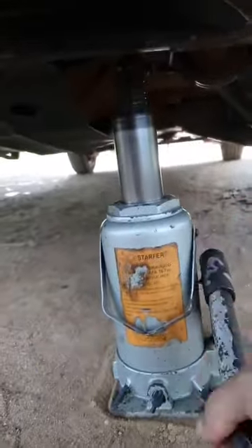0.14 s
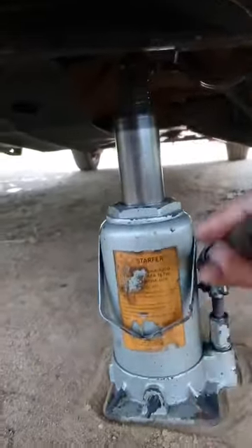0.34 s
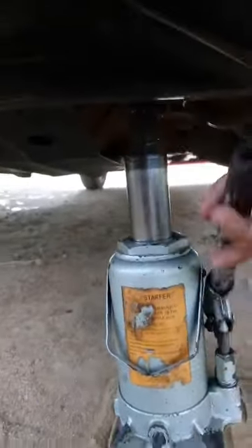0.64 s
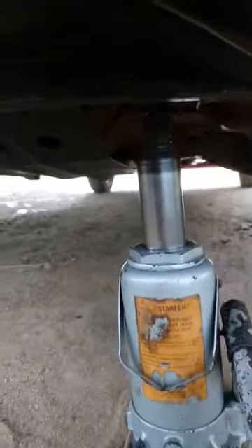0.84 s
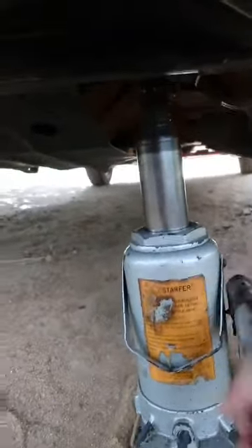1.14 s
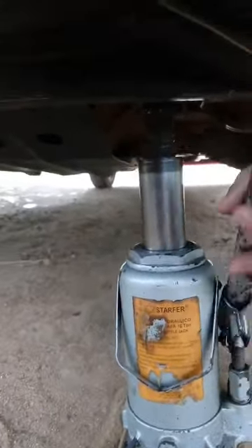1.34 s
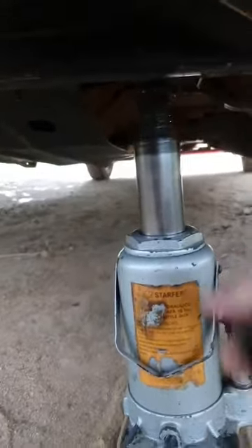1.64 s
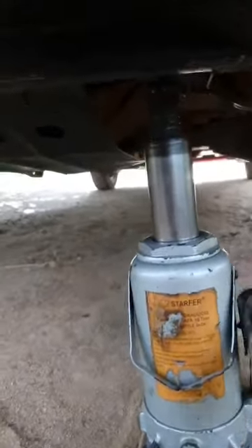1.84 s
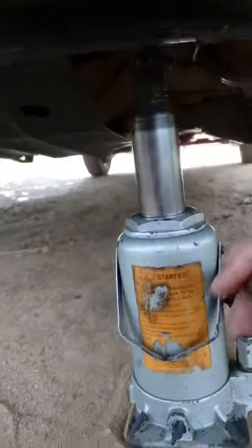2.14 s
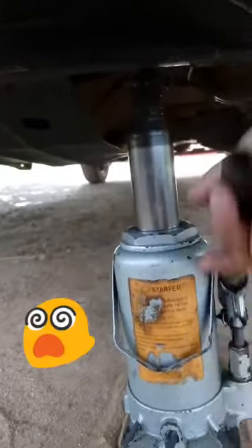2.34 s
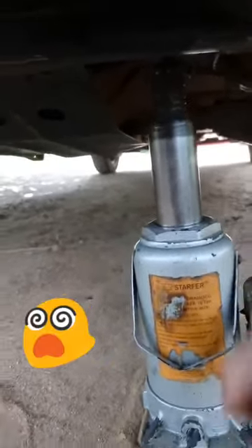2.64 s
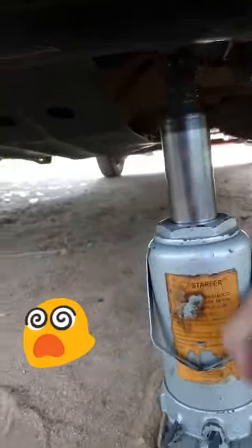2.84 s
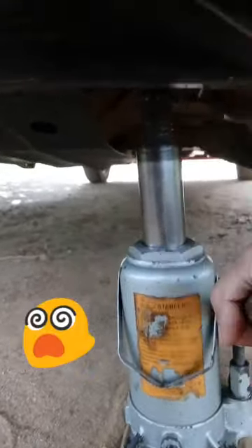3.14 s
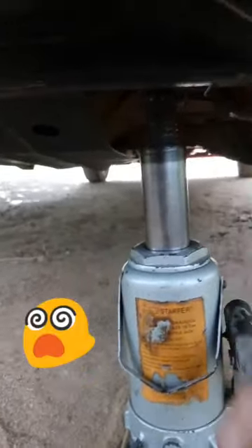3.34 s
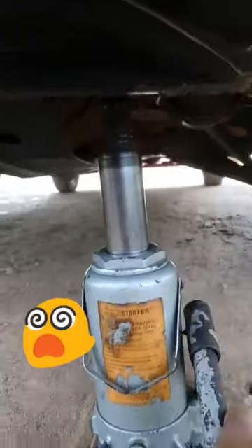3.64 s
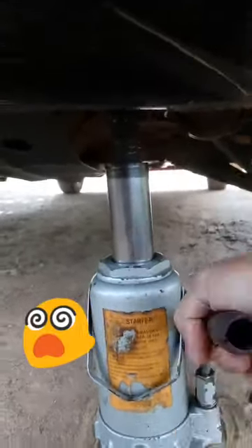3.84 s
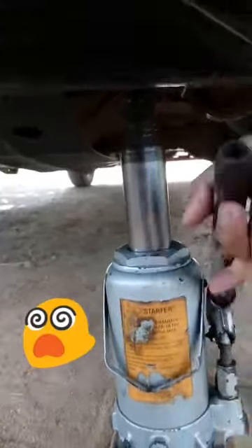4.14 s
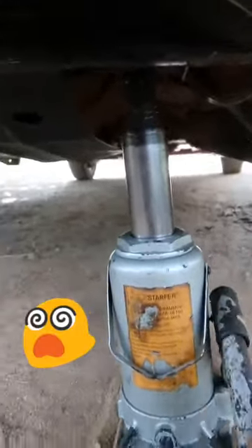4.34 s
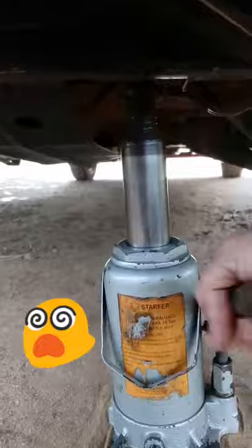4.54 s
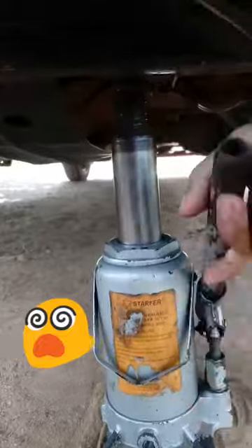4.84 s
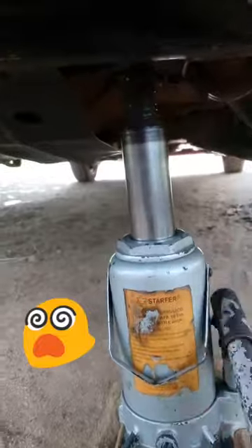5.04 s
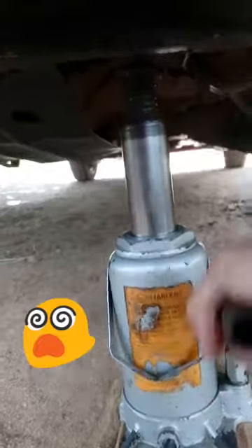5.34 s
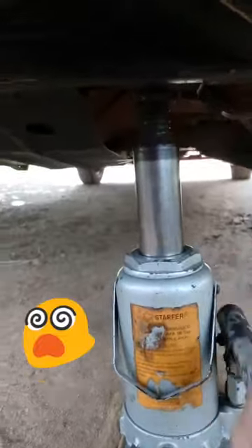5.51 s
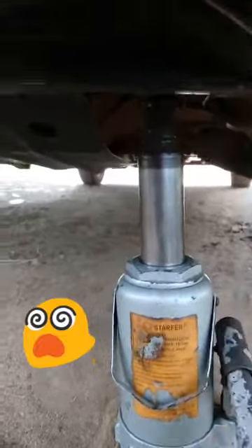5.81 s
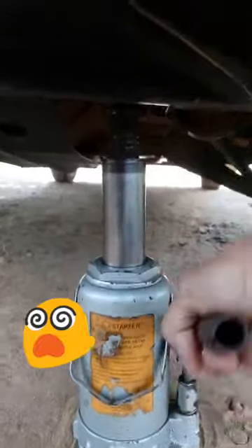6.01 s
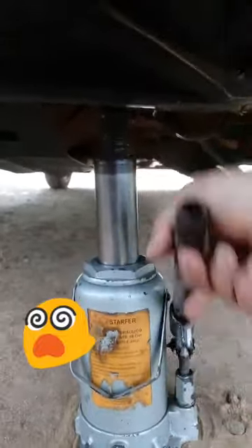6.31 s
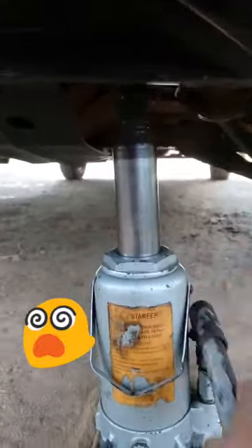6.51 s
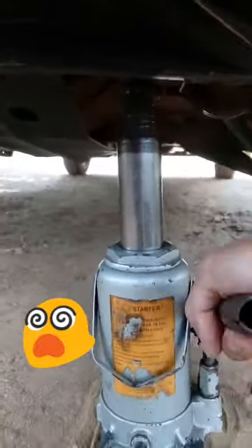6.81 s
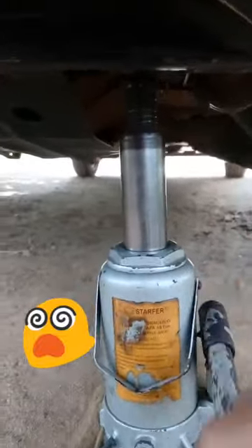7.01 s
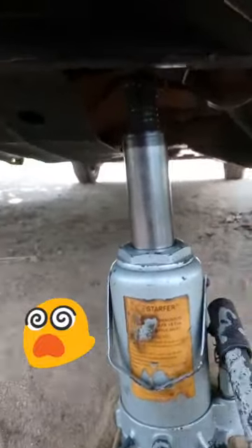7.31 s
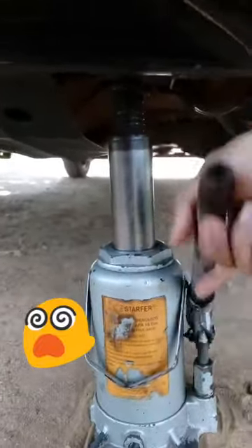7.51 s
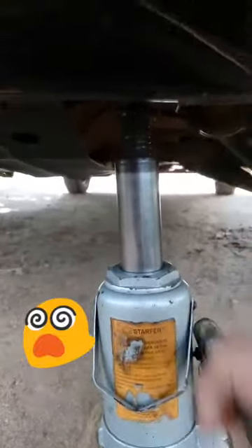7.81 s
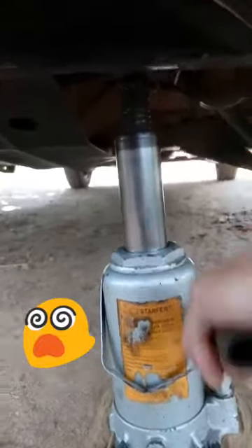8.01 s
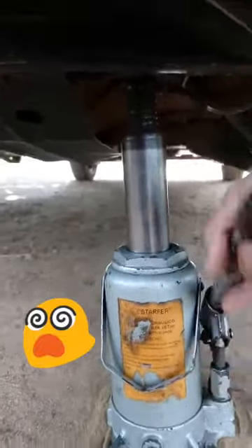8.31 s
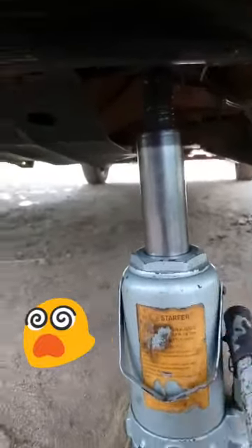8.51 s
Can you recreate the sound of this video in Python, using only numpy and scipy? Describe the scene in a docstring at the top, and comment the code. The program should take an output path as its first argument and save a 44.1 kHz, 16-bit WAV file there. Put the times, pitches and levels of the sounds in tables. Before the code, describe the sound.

From 0 s to about 8.6 s, a hydraulic bottle jack under a car is pumped by hand without a break, around two to three strokes a second. Loose pins and the handle socket make crisp, very short steel clicks, each with a tiny scrape before it and gritty chatter after. Duller, harder clacks mark the handle bottoming out, standing out near 0.5, 1.6, 3.7, 4.4, 5.5 and 7.4 s; bright tight clicks stand out around 2.5, 3.5, 5.3 and 7.6 s. Between them the tube rings briefly and small rebounds tick. Soft low body thuds with weaker repeats lie beneath, fuller from 7 s on. A few faint low bumps come near 4.1, 5.2 and 6.2 s. The stereo microphone is close, the jack slightly right, with short echoes from the underside and a quiet, slowly shifting outdoor wash.

```python
"""Hydraulic bottle jack under a car

A hydraulic bottle jack is pumped by hand, heard in quick strokes, under a car, close to a two-port microphone.
Loose socket and linkage pins click and chatter: noise forces drive decaying steel, handle-tube and body modes.
The oil-filled body thuds, heavily at stroke ends, lightly in between; each thud repeats twice, weaker.
The gap between car and ground throws the jack back briefly as sparse decaying taps.
Under it all lie a soft outdoor floor of shaped noise with drifting patches and a few low noise bumps."""
import sys
import numpy as np
from scipy import signal
from scipy.fft import rfft, irfft, next_fast_len
from scipy.io import wavfile
from scipy.ndimage import uniform_filter1d

SR = 44100
rng = np.random.default_rng(int(sys.argv[2]) if len(sys.argv) > 2 else 0)


def log_audio(samples):
    """Write samples as a 16-bit WAV file to the path given in sys.argv[1]."""
    # one column per channel
    frames = np.atleast_2d(samples).T
    # limit to full scale, then quantise
    limited = np.clip(frames, -1, 1)
    pcm = np.round(limited * 32767).astype(np.int16)
    wavfile.write(sys.argv[1], SR, pcm)


N = 381896
LEAD_S = 1500 / SR  # room before each contact for its scrape
SIDE = np.array([[.5], [-.5]])  # splits a left-right difference over the ports


def gain_of(db):
    """Decibels to gain."""
    return 10 ** (np.asarray(db) / 20)


def evened(x):
    """Scales to rms 1."""
    return x / np.sqrt(np.mean(x ** 2) + 1e-20)


def read(points, hz):
    """Reads a table on a log-frequency axis."""
    points_hz, value = np.transpose(points)
    return np.interp(np.log(hz + 1), np.log(points_hz + 1), value)


def add(mix, start_s, sound):
    """Mixes a sound in at start_s, cropped to the mix."""
    at = round(start_s * SR)
    sound = sound[:, max(-at, 0):]
    part = mix[:, max(at, 0):][:, :sound.shape[1]]
    part += sound[:, :part.shape[1]]


def filtered(x, response):
    """Applies a response given as a function of Hz."""
    size = next_fast_len(N + 4096)
    hz = np.fft.rfftfreq(size, 1 / SR)
    return irfft(rfft(x, size) * response(hz), size)[..., :N]


# Sound from all sides: hz, left_right_likeness
DIFFUSE_SAME = [(280, .96), (650, .15)]


def paired(z, hz):
    """Long waves reach both ports alike, short ones do not."""
    same = np.clip(read(DIFFUSE_SAME, hz), 0, 1)[:, None]
    return np.array([z[0], same * z[0] + np.sqrt(1 - same ** 2) * z[1]])


# Outdoor floor spectrum, relative: hz, density_db
FLOOR = [(25, 7), (238, 9), (368, -5.5), (496, 6), (787, -8), (5880, -13.5), (8140, -25.5), (14800, -34),
         (16000, -50)]
FLOOR_DB = -49


def floor():
    """Soft outdoor wash: shaped noise whose level drifts in time-frequency patches."""
    frames, hz = N // 256 + 5, np.fft.rfftfreq(1024, 1 / SR)
    a, b, c, d, patches = rng.standard_normal((frames, 513, 5)).T
    patches = uniform_filter1d(patches, size=10, axis=0)  # over frequency
    patches = evened(uniform_filter1d(patches, size=12, axis=1))  # over time
    level_db = read(FLOOR, hz)[:, None] + 2.5 * patches
    z = paired([a + 1j * b, c + 1j * d], hz) * gain_of(level_db)
    wash = signal.istft(z, nperseg=1024, noverlap=768)[1][:, :N]
    return gain_of(FLOOR_DB) * evened(wash)


SWELL_MS = 1  # at 4000 Hz and 3 ms fade
SWELL_PER_OCTAVE, SWELL_PER_FADE = 1.28, 0.45  # exponents: bright, drawn-out contacts seat more slowly


def swell_ms_of(centre_hz, fade_ms):
    """Rise time of a contact."""
    return SWELL_MS * (centre_hz / 4000) ** SWELL_PER_OCTAVE * (fade_ms / 3) ** SWELL_PER_FADE


EDGE_POWER = 10  # how abruptly a contact sets in
SCRAPE_DB = -4.5  # the scrape before a contact is softer than the chatter after it


def contact(t, swell_s, fade_s, chatter_db, chatter_stretch, lumps_db, same):
    """Grinding force of a joint: a noise burst around t = 0 amid slower, lumpy scrape and chatter."""
    def shape(early_s, late_s):
        rise = np.exp(-abs(t / (1.66 * early_s)) ** EDGE_POWER)
        return np.where(t < 0, rise, np.exp(-abs(t) / late_s))

    a, b, grain = rng.standard_normal((3, len(t)))
    lumps = gain_of(lumps_db * evened(uniform_filter1d(grain, size=30)))
    noise = np.array([a, same * a + np.sqrt(1 - same ** 2) * b])  # ports face different sides of the part
    noise *= signal.windows.tukey(len(t), .5)
    creep_s = swell_s * (1 + swell_s / 0.00043)  # a slow contact scrapes long before it seats
    chatter = gain_of(chatter_db + SCRAPE_DB * (t < 0)) * lumps * shape(creep_s, fade_s * chatter_stretch)
    return noise * (shape(swell_s, fade_s) + chatter)


BLOOM_CYCLES = 1.45  # the heavy body needs some cycles to take up a blow


def ring(modes, weight_db, t, scatter_db, detune, bloom=0):
    """Every blow lands a little elsewhere, so each decaying mode wakes with its own strength; energy 1."""
    hz, db, t60_s = np.transpose(modes)[:, :, None]
    luck = rng.standard_normal((2, len(modes), 1))
    size = gain_of(db + weight_db(hz) + scatter_db * luck[0] - 60 * t / t60_s)
    size *= (1 - np.exp(-(t + 1 / SR) * hz / (bloom + 1e-6))) ** 2
    waves = np.sin(2 * np.pi * hz * (1 + detune * luck[1]) * t)
    sound = (size * waves).sum(0)
    return sound[None] / np.linalg.norm(sound)


def struck(force, modes):
    """The force drives the modes; the energy of the blow is kept."""
    sound = signal.fftconvolve(force, modes, axes=1)
    return sound * np.linalg.norm(force) / np.linalg.norm(sound)


def strays():
    """After each click a loose pin rebounds once, later and weaker."""
    start_s, level_db, centre_hz, fade_ms = np.transpose(CLICKS)
    wait, size, pitch = rng.random((len(start_s), 3)).T
    return np.transpose([start_s + 0.032 * wait, level_db - 22.5 - 9.1 * size,
                         centre_hz * 1.5 ** (pitch - .5), fade_ms])


# Pin and socket contacts, levels relative: start_s, level_db, centre_hz, fade_ms
CLICKS = [(0.0365, -19.5, 4280, 1.8), (0.0636, -12.5, 4500, 2.44), (0.1717, -10.5, 2470, 3.45),
          (0.2437, -27, 3900, 2.8), (0.2596, -16.5, 5060, 2.8), (0.3416, -21.5, 3320, 1.7),
          (0.375, -16, 3750, 3.1), (0.4495, -19.5, 4670, 0.76), (0.5133, -4, 2580, 1.06),
          (0.601, -33, 3600, 5), (0.6173, -15.5, 3580, 1.6), (0.7452, -11.5, 4500, 1.27),
          (0.8914, -24, 1840, 5.5), (0.9748, -19.5, 4700, 2.3), (0.9864, -16, 4000, 2.7),
          (1.048, -16.5, 3580, 1.5), (1.054, -23, 3400, 2.9), (1.1022, -26.5, 3200, 4.9),
          (1.123, -25.5, 4330, 2.4), (1.2504, -18, 1820, 3), (1.3235, -19, 4440, 2.9),
          (1.332, -17.5, 4700, 2.4), (1.4442, -24, 3830, 2.7), (1.464, -18.5, 4500, 3.4),
          (1.601, -7, 2400, 1.7), (1.6841, -19, 4320, 3.8), (1.816, -10, 4950, 0.61),
          (1.881, -22, 4650, 0.71), (1.936, -18.5, 1620, 2.6), (2.0056, -28, 4600, 3.6),
          (2.012, -19.5, 5350, 2.8), (2.132, -21, 3540, 2.5), (2.1571, -14, 4930, 2.2),
          (2.367, -16.5, 5300, 1.4), (2.3725, -22, 4860, 4.9), (2.4686, -18, 3320, 3),
          (2.488, -23.5, 4250, 2.5), (2.496, -8.5, 4270, 0.8), (2.5414, -10.5, 4580, 0.21),
          (2.6168, -26, 1840, 6.1), (2.7024, -18, 3200, 4.1), (2.7893, -18, 3030, 3.4),
          (2.8072, -19, 4100, 3.6), (2.8326, -22.5, 3250, 2.3), (2.952, -24.5, 2320, 6.1),
          (3.043, -25, 3100, 8.5), (3.0489, -14, 4030, 2.7), (3.1552, -13.5, 3970, 3.5),
          (3.1794, -20.5, 4270, 3.6), (3.1874, -11.5, 4030.0, 0.92), (3.239, -23.5, 3670, 0.89),
          (3.319, -17, 2670, 2.9), (3.4106, -14, 5370, 3.03), (3.5, -12, 3860, 2.4),
          (3.5226, -17, 5130, 2.4), (3.53, -6, 4600, 0.32), (3.5737, -21.5, 4280, 2.15),
          (3.6688, -10, 2260, 1.8), (3.7657, -17, 5000, 3.6), (3.8098, -29, 5030, 2.9),
          (3.8603, -13.5, 3100, 6.8), (3.8988, -19.5, 3330, 1.8), (3.96, -25.5, 4100, 0.64),
          (4.0203, -10, 2220, 0.56), (4.094, -18, 3570, 2.4), (4.1021, -18, 4500, 5),
          (4.1154, -16.5, 4640, 3), (4.224, -10.5, 4900, 1.3), (4.2467, -10, 4500, 1.8),
          (4.3, -33.5, 3550, 3), (4.376, -5, 2290, 0.54), (4.45, -40, 4740, 5.8),
          (4.458, -20.5, 5200, 4.64), (4.5748, -21, 3600, 8.7), (4.6026, -12.5, 3900, 2),
          (4.7287, -13, 2340, 1.4), (4.819, -28, 4170, 8.3), (4.896, -26.5, 3720, 0.73),
          (4.9425, -14.5, 3600, 4.35), (5.0274, -19, 3800, 0.32), (5.0927, -12, 2480, 1.3),
          (5.16, -34.5, 3120, 15), (5.1977, -20.5, 3950, 4), (5.311, -8.5, 4740, 1.7),
          (5.3376, -8.5, 4500, 0.97), (5.4743, -9, 2260, 0.94), (5.554, -23, 3300, 3),
          (5.5671, -16, 4800, 4.2), (5.6522, -13.5, 3300, 1.3), (5.6656, -21, 4350, 3),
          (5.7045, -14.5, 5350, 2.8), (5.77, -36.5, 4020, 4.2), (5.807, -38.5, 3500, 8.5),
          (5.8347, -21.5, 2380, 3.2), (5.9218, -16.5, 4600, 1.6), (5.932, -25.5, 3960, 6.9),
          (5.9422, -14.5, 5150, 1.5), (6.038, -30, 3020, 5), (6.0483, -15.5, 4360, 3.4),
          (6.0759, -9.5, 4900, 1.8), (6.2165, -28.5, 2350, 4.8), (6.2907, -23.5, 3380, 4),
          (6.3064, -24, 5100, 4.84), (6.4178, -17, 3650, 6.5), (6.44, -27.5, 3900, 3.4),
          (6.4606, -13.5, 3800, 2.7), (6.6043, -25.5, 1770, 3.1), (6.6924, -25.5, 5000, 6.3),
          (6.8439, -16, 4630, 3.2), (7.0842, -21, 5460, 5.25), (7.0946, -23, 5290.0, 0.51),
          (7.208, -14.5, 4870, 2.8), (7.2341, -12.5, 4430, 2), (7.3583, -5.5, 1950, 0.93),
          (7.4432, -21.5, 3680, 6.2), (7.4552, -23, 3300, 4.1), (7.5726, -15.5, 3780, 5.3),
          (7.603, -8.5, 3930, 1.37), (7.7628, -25, 1280, 1.6), (7.8421, -25, 4940, 5.5),
          (7.854, -14, 4270, 2.27), (7.975, -13.5, 2930, 4.8), (8.0009, -12, 4050, 2.14),
          (8.1456, -14.5, 1850, 1.4), (8.2318, -19, 3800, 6.2), (8.2504, -25, 4800.0, 1.8),
          (8.3749, -17.5, 4360, 2.4), (8.396, -15.5, 3700, 2.86), (8.4011, -19, 3770, 1.1),
          (8.5312, -18.5, 1790, 2.3), (8.6345, -20, 6100, 3.6)]
# Steel linkage and handle, each row used as a cluster of three close modes: mode_hz, level_db, t60_s
LINKAGE = [(1496, -13, 0.021), (1967, 0.5, 0.011), (3270, 3, 0.024), (4146, 12.5, 0.01), (5020, 12.5, 0.01),
           (6100, 28, 0.00088), (6386, 18.5, 0.013)]
# Jack body on the ground: mode_hz, level_db, t60_s
BODY = [(171.6, 2.5, 0.052), (251, 4.4, 0.058), (513.5, -2.5, 0.055), (722, -13.5, 0.047),
        (882.3, -26, 0.2), (1178, -14, 0.042), (1372, -7.5, 0.012)]
# Bare contact spectrum, relative: hz, density_db
CRACK = [(500, -60), (1500, -5.5), (5800, 3), (7600, -6), (10000, -5), (13500, -14), (15000, -6),
         (15900, -26)]
DULL_HZ = 2800  # clicks below this pitch are the handle bottoming out
DULL_LIFT_DB = 9  # bottoming out wakes the two lowest steel modes


def clicks():
    """A pin takes up its slack: the contact cracks, wakes steel modes near its pitch and nudges the body."""
    rings, cracks = np.zeros((2, 2, N))
    t = np.arange(6000) / SR
    for start_s, level_db, centre_hz, fade_ms in [*CLICKS, *strays()]:
        def near_db(hz):
            lift_db = DULL_LIFT_DB * (centre_hz < DULL_HZ) * (hz < DULL_HZ)
            return -13. * np.log2(hz / centre_hz) ** 2 + lift_db

        swell_s = swell_ms_of(centre_hz, fade_ms) / 1000
        force = contact(t - LEAD_S, swell_s, fade_ms / 1000, chatter_db=-3.0,
                        chatter_stretch=3.69, lumps_db=6.0, same=0.15)
        steel = ring(3 * LINKAGE, near_db, t[:2500], scatter_db=7.5, detune=0.061)
        add(rings, start_s - LEAD_S, gain_of(level_db - 11.5) * struck(force, steel))
        body = ring(BODY[2:], np.zeros_like, t, scatter_db=2, detune=.01, bloom=BLOOM_CYCLES)
        add(rings, start_s - LEAD_S, gain_of(level_db - 23.0) * struck(force, body))
        bright_db = 7.84 * np.log2(centre_hz / 4000)  # dull knocks crack less
        add(cracks, start_s - LEAD_S, gain_of(level_db - 13.5 + bright_db) * force)

    def colour(hz):
        return gain_of(read(CRACK, hz))

    colour_rms = np.sqrt(np.mean(colour(np.arange(0, SR / 2)) ** 2))
    return rings + filtered(cracks, colour) / colour_rms


# Handle tube: mode_hz, level_re_click_db, slope_db_per_octave of click pitch, t60_s
TUBE = [(2410, -10, 0.5, 0.034), (5013, -14, 3.5, 0.038), (6044, -10, 27.5, 0.034)]
JAR_DB_PER_FADE = 9.5  # per doubling of the fade: long grinding contacts jar the tube, short ticks hardly
# pulled back up, the tube jars hardest this long after the bottom
TURN_S, TURN_SPREAD_S, TURN_DB = .085, .02, 7


def jars():
    """The tube rings at three pitches while the socket grinds on it."""
    out = np.zeros((2, N))
    t = np.arange(4500) / SR
    dull_s = [start_s for start_s, _, centre_hz, _ in CLICKS if centre_hz < DULL_HZ]
    deep_s = [start_s for start_s, _, low_db in THUDS if low_db > 0]
    bottoms_s = np.array(dull_s + deep_s)
    for start_s, click_db, centre_hz, fade_ms in CLICKS:
        swell_s = 0.58 * swell_ms_of(centre_hz, fade_ms) / 1000
        force = contact(t - LEAD_S, swell_s, 0.77 * fade_ms / 1000, chatter_db=-6.5,
                        chatter_stretch=2.55, lumps_db=4.5, same=0.18)
        turning = np.exp(-((start_s - bottoms_s - TURN_S) / TURN_SPREAD_S) ** 2).max()
        jar_db = click_db + JAR_DB_PER_FADE * np.log2(fade_ms / 6) + TURN_DB * (turning - .5)
        for mode_hz, db, slope_db, t60_s in TUBE:
            tube = ring([(mode_hz, 0, t60_s)], np.zeros_like, t, scatter_db=0, detune=0.00053)
            tube_db = jar_db + db + slope_db * np.log2(centre_hz / 4000)
            add(out, start_s - LEAD_S, gain_of(tube_db) * struck(force, tube))
    return out


# Thuds of the jack body, heavy at stroke ends, light in between, levels relative:
# start_s, level_db, low_mode_weight_db
THUDS = [(0.076, -27, -12), (0.183, -31.5, -6.5), (0.524, -33, -9), (0.896, -28.5, -3.5),
         (1.126, -31.5, -12.5), (1.263, -33, -12), (1.609, -31, 21), (1.941, -32.5, 1.5), (2.321, -37, -4),
         (2.626, -29.5, 4), (2.838, -28, -7), (2.967, -25, -8.5), (3.326, -30, -5), (3.681, -35, -17),
         (3.911, -31, -8), (4.027, -39, 21), (4.385, -40, 12), (4.584, -28.5, -8), (4.739, -33, -20),
         (4.974, -28, -17), (5.1, -35, -14), (5.32, -29, -7), (5.718, -31.5, -13), (5.845, -29.5, -15),
         (6.228, -31, -17.5), (6.473, -29, -8), (6.855, -30, -18), (7.015, -25.5, 0.5), (7.369, -24, -3),
         (7.767, -25, -5), (8.158, -27, -2), (8.537, -29.5, 3), (8.582, -29.5, -3.5)]
REPEAT_S, REPEAT_DB = .035, -12  # per repeat of the thud; wait varies x0.8 to x1.3
GRIT_DB = -13  # loose steel shaken by each thud


def thuds():
    """A rough, rattling push swings the modes of the oil-filled body; each thud repeats twice, weaker."""
    out = np.zeros((2, N))
    t = np.arange(6000) / SR
    for start_s, level_db, low_db in THUDS:
        def low_weight_db(hz):
            return low_db * np.clip(np.log2(480 / hz), 0, 1)

        for repeat in range(3):
            wait_s = repeat * REPEAT_S * (.8 + .5 * rng.random())
            thud_db = level_db + repeat * REPEAT_DB
            at_s = start_s + wait_s - LEAD_S
            # the push comes 10.6 ms early, as the body blooms late
            force = contact(t - LEAD_S + 0.0106, 0.0011, 0.0075, chatter_db=-1.0,
                            chatter_stretch=1.0, lumps_db=4.5, same=0.93)
            body = ring(BODY, low_weight_db, t, scatter_db=2.5, detune=0.029, bloom=BLOOM_CYCLES)
            add(out, at_s, gain_of(thud_db) * struck(force, body))
            grit = ring(3 * LINKAGE[:2], np.zeros_like, t[:1500], scatter_db=4, detune=.15)
            add(out, at_s, gain_of(thud_db + GRIT_DB) * struck(force, grit))
    return out


# Gap below the car: hz, t60_s
UNDERSIDE = [(300, 0.26), (8000, 0.005)]


def underside(x):
    """Echoes: sparse taps of random sign, each band dying at its own speed, other taps at each port."""
    taps = np.zeros((2, 16000))
    at = np.arange(60, 15900, 20) + rng.integers(0, 20, (2, 792))
    np.put_along_axis(taps, at, rng.choice([-1., 1.], at.shape), 1)
    hz, t, z = signal.stft(taps, SR, nperseg=512)
    decay = gain_of(-60 * t / read(UNDERSIDE, hz)[:, None])
    tail = signal.istft(paired(z, hz) * decay, SR, nperseg=512)[1]
    return signal.fftconvolve(x[None], tail / np.linalg.norm(tail[0]), axes=1)[:, :N]


# Low bumps: centre_s, level_db
BUMPS = [(4.055, -37), (5.13, -41.5), (5.232, -37.5), (6.246, -36), (8.57, -42)]
BUMP_S, BUMP_HZ = 0.033, 151  # standard deviation of the envelope, top of the band


def bumps():
    """Short lumps of low noise, partly unrelated at the two ports."""
    def lowpass(hz):
        return 1 / (1 + (hz / BUMP_HZ) ** 4)

    t = np.arange(N) / SR
    left, right, common = rng.standard_normal((3, N))
    low = evened(filtered(np.array([left + common, right + common]), lowpass))
    return low * sum(gain_of(level_db) * np.exp(-((t - centre_s) / BUMP_S) ** 2 / 2)
                     for centre_s, level_db in BUMPS)


# Phase between the ports, negative where the right leads: hz, left_lead_rad
PORT_TURN = [(150, 0), (500, -1.5), (1500, -2), (4000, -5.8), (6000, -12.6)]


def scene():
    """The jack reaches the right port first; its echoes reach both ports by different taps."""
    def turn(hz):
        return np.exp(1j * SIDE * read(PORT_TURN, hz))

    wash = floor()
    jack = clicks() + jars() + thuds()
    echoes = gain_of(-14.0) * underside(jack.mean(0))
    return wash + filtered(jack, turn) + echoes + bumps()


# Port colour: hz, left_minus_right_db
PORT_DB = [(200, 0.5), (500, -5), (4000, -.5), (13000, -8)]
CEILING = .85  # full-scale fraction that rounded peaks approach
EDGE_HZ = 16200


def record(dry):
    """The two ports differ in colour and drop the deep bass; peaks round off; then the band limit."""
    def port(hz):
        return gain_of(SIDE * read(PORT_DB, hz)) / (1 + (85 / (hz + 1)) ** 2)

    rounded = CEILING * np.tanh(filtered(dry, port) / CEILING)
    edge = signal.firwin(511, EDGE_HZ, window=("kaiser", 12), fs=SR)
    return signal.oaconvolve(rounded, edge[None], "same")


dry = scene()
out = record(dry)
log_audio(out)
```